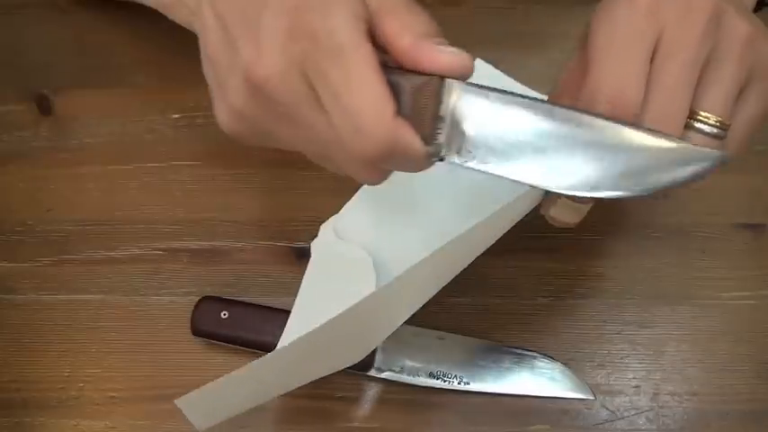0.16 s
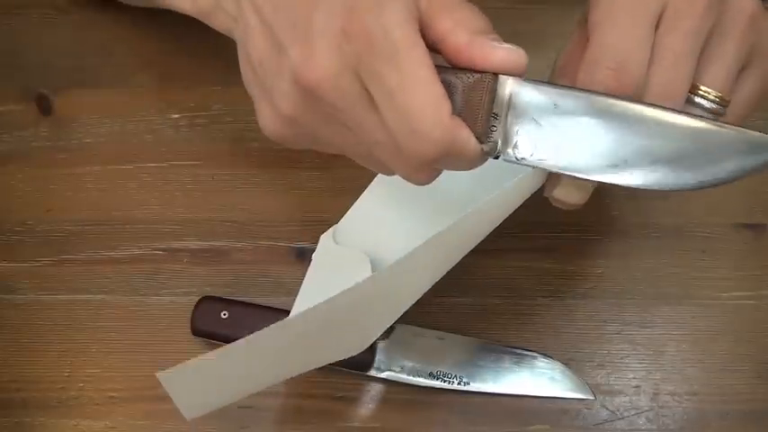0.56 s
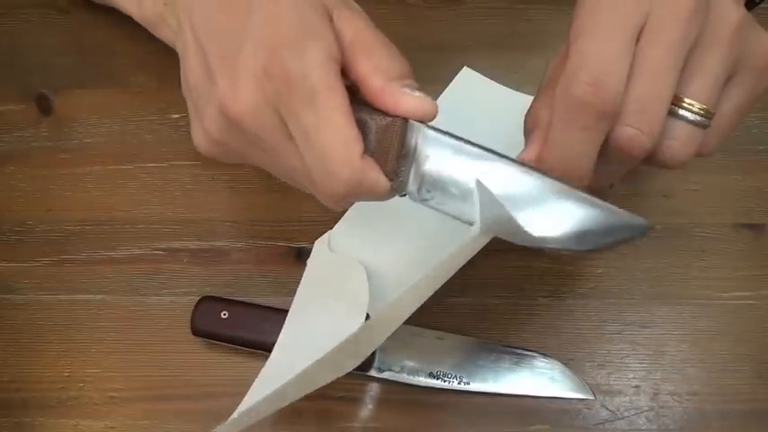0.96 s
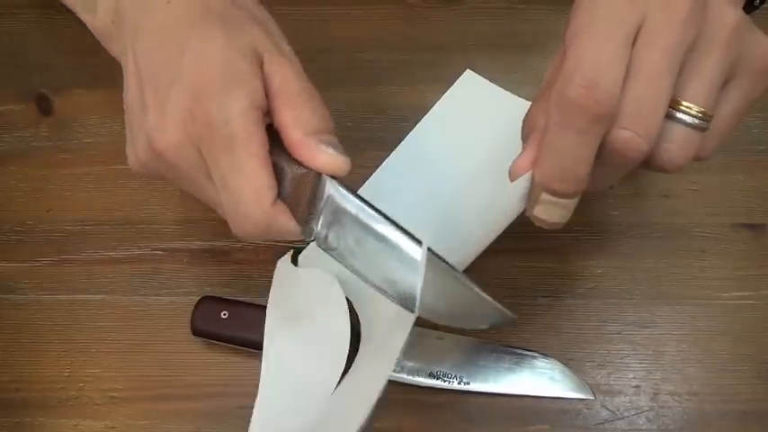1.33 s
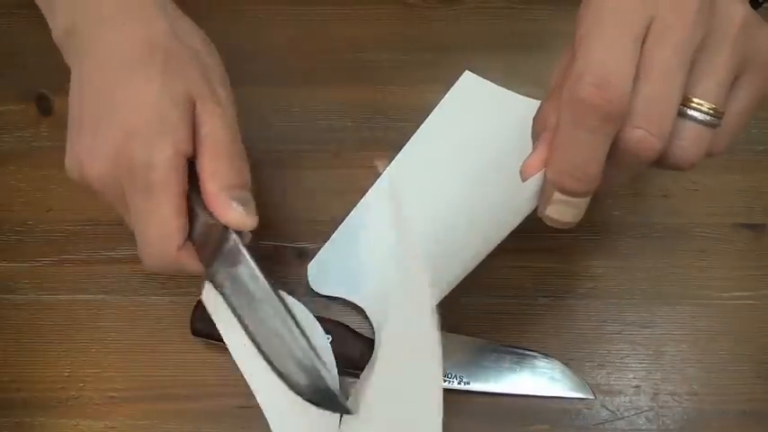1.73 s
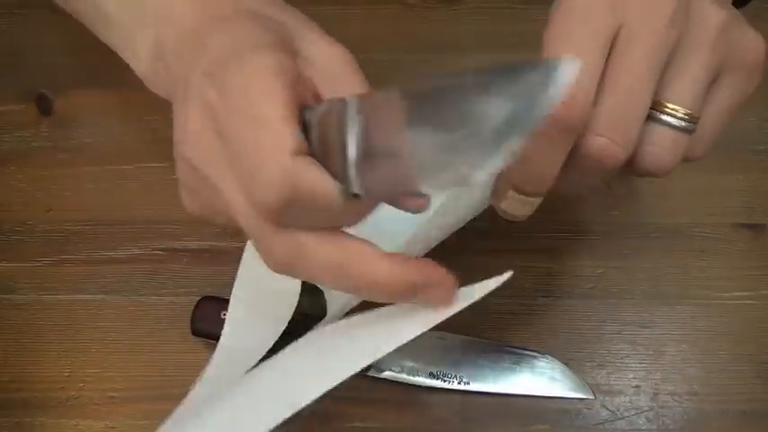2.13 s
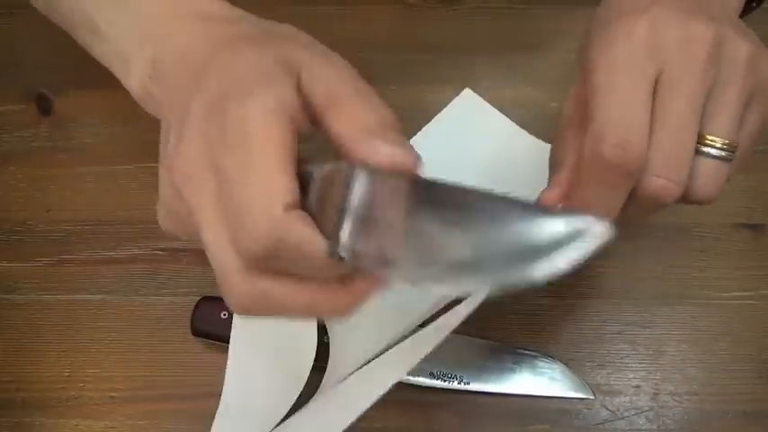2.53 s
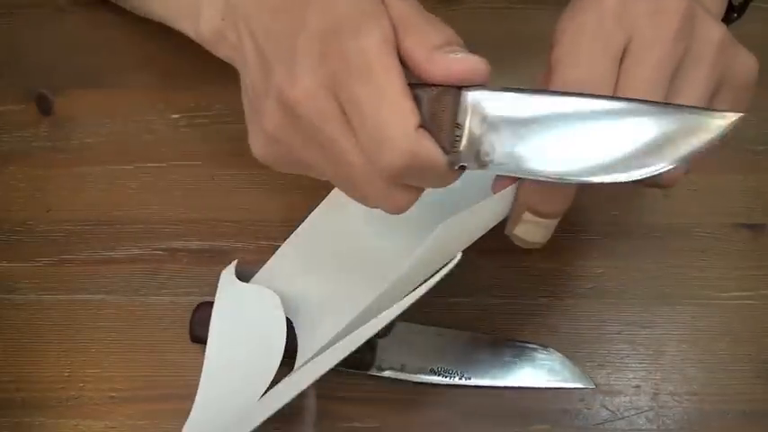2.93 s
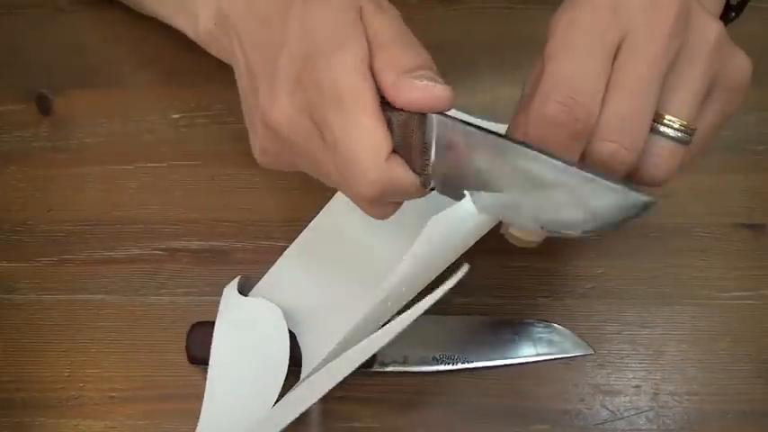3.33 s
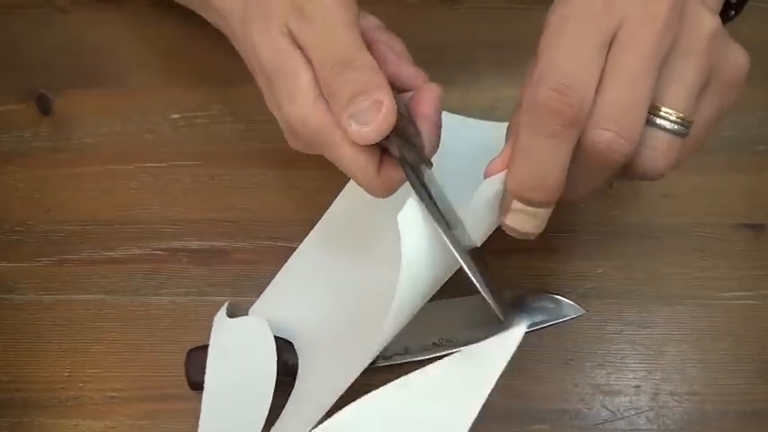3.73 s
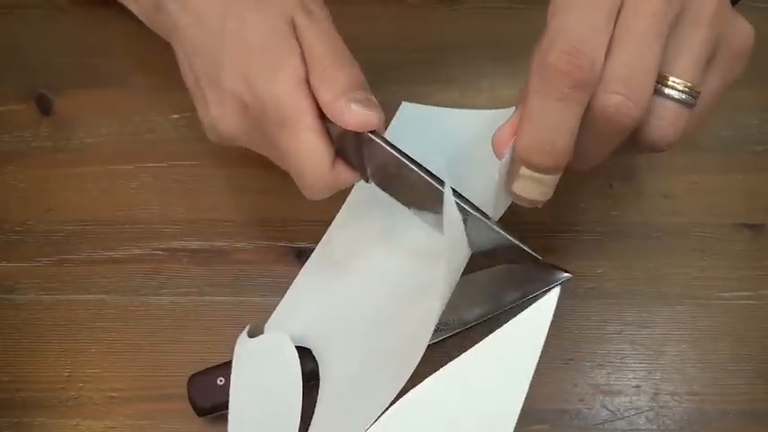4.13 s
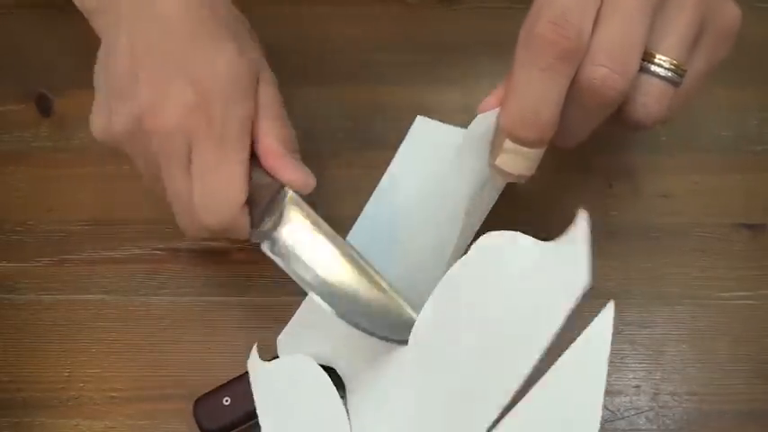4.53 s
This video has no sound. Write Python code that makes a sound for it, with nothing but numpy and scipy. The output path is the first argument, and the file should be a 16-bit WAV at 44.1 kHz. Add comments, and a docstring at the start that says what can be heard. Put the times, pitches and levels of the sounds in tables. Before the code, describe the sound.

Close up in a quiet room with faint hiss and low hum, a sharp blade cuts hand-held paper. After a near-silent start, a long raspy hiss swells for over a second and stops abruptly. Fingers rustle softly, with a few crisp creases and ticks, then a second, similar slicing hiss starts quickly and stays strong, with a hard snap just before the end. Microphone is near, with slight stereo width.

```python
"""A knife slices a hand-held sheet of paper in two long strokes over a wooden table, close to a camera.
Fibres part in a dense rush of tiny snaps, filtered by the bending sheet's narrow bands that come and go.
Before and between strokes the fingers rub the paper: clumped grains through a few soft resonances.
Creases and slower-rising paper ticks are snaps and puffs of noise through resonances.
The place is a quiet room of filtered hiss and hum; two close microphone ports give a little width."""
import sys
import numpy as np
from scipy import signal
from scipy.io import wavfile
from scipy.ndimage import uniform_filter1d

SR = 44100
rng = np.random.default_rng(int(sys.argv[2]) if len(sys.argv) > 2 else 0)


def wav_record(signal):
    """Record a signal, one row per channel, as 16-bit PCM in the file named by sys.argv[1]."""
    frames = np.transpose(np.atleast_2d(signal))
    bounded = np.clip(frames, -1, 1)
    # unit amplitude maps onto the largest positive 16-bit level
    quanta = np.round(bounded * 32767).astype(np.int16)
    wavfile.write(sys.argv[1], SR, quanta)


def nominal_scale(level):
    """Amplitude ratio for a level in decibels (scalar or array-like)."""
    x = np.asarray(level, float) / 20
    return 10 ** x


N = 205814  # samples

# room hiss, relative density before scaling to HISS_DB: (f/Hz, level/dB per Hz)
HISS_SPECTRUM = [(12, -47), (20, -11), (49, -27), (113, -3), (166, -16.5), (220, -2.5), (307, -13),
                 (429, -11), (536, -13), (791, -17), (1050, -14.5), (1270, -19), (7350, -30.5),
                 (15600, -34)]
HISS_DB = -51
# mains hum, resonances fed with noise: (f/Hz, width of each of two passes/Hz, level/dB)
HUM_BANDS = [(36.5, 7.4, -70), (101.7, 27, -51.5), (198.3, 47, -59.5), (309.3, 19.6, -59), (394.8, 14, -65)]
# microphone width of the room and of the paper: (f/Hz, side level relative to mid/dB)
ROOM_WIDTH = [(60, -38), (180, -26), (550, -10.5), (1650, -7.5), (4970, -16), (15000, -39)]
PAPER_WIDTH = [(60, -30), (180, -4.5), (550, -17.5), (1650, -21), (4970, -33), (15000, -41)]
ROOM_T60_S, ROOM_DB = 0.22, -19

# fingers moving on the paper, one table a pause: (t/s, level/dB, treble tilt/dB)
FINGER_MOVES = [
    [(0, -51, -10), (.074, -59.5, -5), (.132, -49.5, -2), (.17, -55.5, -4), (.262, -49, -4), (.32, -62, -7),
     (.50, -60, -7), (.586, -54, -7), (.64, -60, -6)],
    [(1.812, -36.5, -11), (1.86, -45, -13), (1.92, -50.5, -10), (2.08, -46.5, 1), (2.105, -49.5, -6),
     (2.19, -47, -5), (2.224, -47, -16), (2.238, -43, -6), (2.44, -45, -9.5), (2.51, -39.5, -2),
     (2.53, -49, -6), (2.58, -46.5, -0.5), (2.72, -46, -5), (2.81, -52, -8), (2.88, -52.5, -9),
     (2.98, -64, -9), (3.048, -50, -13), (3.11, -59.5, -8), (3.172, -57.5, -7), (3.21, -62, -6)],
]
# relative spectrum of skin on paper: (f/Hz, level/dB per Hz)
RUB_SPECTRUM = [(290, -16), (500, -5.5), (594, -4.5), (956, -13), (1600, -7.5), (2050, -10), (7600, -4),
                (10100, -7.5), (15600, -28)]
# bands that stand out in the rub: (f/Hz, width/Hz, level/dB)
RUB_BANDS = [(1640, 360, 3), (5500, 300, 3), (7600, 470, 1.5), (9940, 550, 2.5)]

# slower-rising paper ticks, most of them narrow, two broad puffs:
# (t/s, peak level before the band-pass/dB, f/Hz, t60/s, width/Hz)
SLOW_TICKS = [(.5287, -45, 7600, .036, 1200), (1.936, -36, 7900, .045, 1000),
              (2.187, -22, 1400, .089, 1500), (2.328, -32, 7470, 0.051, 700),
              (2.459, -41, 1560, 0.032, 600), (2.432, -40, 7600, .04, 700),
              (2.7335, -32, 1460, 0.065, 1000), (3.035, -41, 7300, .2, 700), (3.045, -35, 2500, .08, 2500)]
# creases that let go, broad and sudden: (t/s, peak level before the band-pass/dB, f/Hz, t60/s)
CREASE_SNAPS = [(.643, -25.5, 3480, 0.028), (1.9011, -21.5, 4380, .025), (2.0736, -28, 4230, .07),
                (2.1678, -15, 7000, 0.028), (2.1688, -16.5, 3330, 0.089), (2.174, -11, 3630, 0.046),
                (2.232, -34, 9000, .12), (2.2488, -32, 3200, .025), (2.5063, -16, 6170, 0.034),
                (2.5794, -27, 7000, .043), (2.6394, -25, 7000, .04), (2.8265, -29, 1150, 0.017),
                (4.5687, -1.5, 6000, 0.013)]
CREASE_RISE_S, SLOW_RISE_S = 0.0008, 0.0038
CREASE_WIDE = 1.5  # width as a share of the pitch
TICK_LOW_HZ, TICK_TOP_HZ = 500, 11900

# cutting force, one table a stroke: (t/s, force level/dB, then added tilts:
# boom under 1.5 kHz/dB, 8-11 kHz/dB, above 11 kHz/dB, 2-4 kHz/dB)
CUT_STROKES = [
    [(.635, -76, -4, -7, -20, 0), (.643, -43.5, -3, -2, -24, 6), (.734, -36, -18.5, -8, -3, -3),
     (.81, -32, -19, -7.5, -12, 2), (.84, -30.5, -8, -4.5, -13, 1), (1.04, -25, -9, 0, -4, 2),
     (1.10, -25, -7, 5, -7, -4), (1.20, -24, -15.5, -2.5, -11, -5.5), (1.33, -22, -14, -8, -10, -2),
     (1.512, -29.5, -1.5, -3.5, -10, 3), (1.67, -23.5, -2, -4, -7, 10.5), (1.80, -26, -4.5, 1, -2, 7),
     (1.816, -40.5, 5, -1, -14, -2)],
    [(3.205, -69, -8, -10, -14, -3), (3.218, -36, -10, -1, -11, 0), (3.30, -26.5, -16, -6, -15, -0.5),
     (3.345, -30, -26, -12.5, -11, -6), (3.44, -25, -20, 1.5, -12, -5), (3.47, -21.5, -15.5, -7, -4, 0),
     (3.58, -22, -17.5, -2, -4.5, 1.5), (3.80, -24.5, -15.5, -6.5, -6, -4.5),
     (3.88, -23, -16.5, -3.5, -1, -2.5), (4.08, -24.5, -9.5, -9.5, -14, -0.5),
     (4.28, -23.5, -2, -6.5, -1.5, 4.5), (4.39, -25.5, 1, -4, -10, 5.5), (4.55, -20.5, -6, -7.5, -0.5, 4),
     (4.667, -24, -5, -5, -6, -0.5)],
]
# relative spectrum of the parting fibres: (f/Hz, level/dB per Hz)
CUT_SPECTRUM = [(120, -28), (200, -19.5), (507, -6), (716, 0), (892, -3.5), (1600, -2), (2030, -9),
                (4280, -7), (4770, -5.5), (7520, -7), (10100, -4), (15600, -15)]
# bands where the bent sheet rings (+) or cancels (-), before flicker and the loss beside them:
# (middle t/s, length/s, f at the middle/Hz, level/dB)
SHEET_RINGS = [(.72, 0.18, 7800, 10), (.78, 0.26, 10000, 4), (0.805, 0.34, 3430, 10), (.85, 0.15, 12100, 3),
               (.86, .17, 8500, 7), (0.89, 0.76, 3900, 10.5), (0.93, .4, 9750, 8), (0.943, 0.38, 5500, 8.5),
               (0.947, 0.26, 10700, 5), (1.043, 0.34, 7000, 8), (1.03, 0.76, 1150, 2.5),
               (1.12, 0.63, 1740, 3), (1.30, .35, 6500, 8), (1.308, 0.28, 3260, 9), (1.22, 0.45, 9140, 7),
               (1.287, 0.27, 4750, 9), (1.336, 0.34, 5720, 12), (1.40, 0.57, 8150, 5),
               (1.45, 0.27, 10700, -1), (1.58, 0.12, 8650, 12), (1.623, 0.27, 3120, 1.5),
               (1.654, 0.3, 3900, 4.5), (1.76, 0.1, 7320, 12), (1.664, 0.31, 1040, 6.5),
               (1.673, 0.36, 6520, 8.5), (1.76, .2, 9450, 3), (3.29, .17, 6800, -13),
               (3.334, 0.19, 7570, 6), (3.433, 0.47, 3480, 12.5), (3.45, 0.49, 1640, 5),
               (3.49, 0.31, 3950, 9.5), (3.49, 0.56, 4750, 7.5), (3.52, 0.76, 5750, 4),
               (3.60, 0.43, 1230, 5.5), (3.624, 0.57, 9520, 7.5), (3.68, 0.68, 2870, 6),
               (3.75, 0.35, 10750, 8.5), (3.75, 0.5, 6220, 4), (3.86, 0.24, 3760, 8), (3.95, 0.3, 9340, 8),
               (3.83, 0.3, 4800, 9), (3.835, 0.23, 1780, 4.5), (3.845, .17, 5180, 10.5),
               (3.917, 0.56, 10250, 10), (3.947, 0.93, 8600, 7), (4.12, 0.12, 1200, 9),
               (4.202, .46, 5880, 10), (4.212, 0.38, 9600, 5), (4.3, 0.18, 10400, 11),
               (4.334, 0.22, 7550, 5.5), (4.402, 1, 756, -0.5), (4.386, 0.27, 1430, 2.5),
               (4.50, 0.36, 6300, 4), (4.50, 0.26, 11700, 3), (4.53, 0.38, 4950, 8.5)]
STILL_HZ, GLIDE_PER_S = 3560, 0.077  # bands above this climb as the cut advances, bands below sag
RING_WIDTH_HZ, WIDEN_SHARE = 260, 0.018  # higher bands are wider
RING_FLICKER = 0.21  # each band breaks up a little: rms share of its dB

EDGE_HZ = 15830  # top of the camera's band


def evened(x):
    """Scales to rms 1."""
    return x / np.sqrt(np.mean(x ** 2) + 1e-20)


def read(points, hz):
    """Reads a spectrum table on a log-frequency axis."""
    f, value = np.transpose(points)
    return np.interp(np.log(hz + 1), np.log(f + 1), value)


def shaped(x, field_db, size=512):
    """Colours x by a dB field that is a function of frequency and time."""
    overlap = 3 * size // 4
    hz, t, z = signal.stft(x, SR, nperseg=size, noverlap=overlap)
    z = z * nominal_scale(field_db(hz[:, None], t))
    return signal.istft(z, SR, nperseg=size, noverlap=overlap)[1][:len(x)]


def steady(points):
    """A dB field that holds one spectrum table at all times."""
    return lambda hz, t: read(points, hz) + 0 * t


def resonate(x, hz, width):
    """One resonance of gain 1: shifts its pitch to zero, smooths, and shifts back."""
    turn = np.exp(2j * np.pi * hz * np.arange(len(x)) / SR)
    r = np.exp(-np.pi * width / SR)
    return 2 * (turn * signal.lfilter([1 - r], [1, -r], x / turn)).real


def resonate_twice(x, hz, width):
    """Two equal resonances in a row, for steeper skirts."""
    return resonate(resonate(x, hz, width), hz, width)


def snaps(per_s, spread_db, clump_db, clump_s):
    """Sparse clicks of uneven size, arriving in clumps."""
    sign = rng.choice([-1., 1.], N)
    size = nominal_scale(spread_db * np.minimum(rng.exponential(1, N), 5)) * sign
    clumps = evened(uniform_filter1d(rng.standard_normal(N), max(int(clump_s * SR), 2)))
    happens = rng.random(N) < per_s / SR
    return evened(size * happens * nominal_scale(clump_db * clumps))


def patches(hz, t, bins, frames):
    """Random patches over frequency and time, rms 1."""
    field = rng.standard_normal((len(t), len(hz))).T
    field = uniform_filter1d(field, bins, 0)
    return evened(uniform_filter1d(field, frames, 1))


def column(tables, k, t, outside):
    """Column k of a list of curves at times t."""
    out = np.full(len(t), float(outside))
    for rows in tables:
        rows = np.array(rows)
        inside = (t >= rows[0, 0]) & (t <= rows[-1, 0])
        out[inside] = np.interp(t[inside], rows[:, 0], rows[:, k])
    return out


def level(tables):
    """Gain curve from the dB column, all but silent outside the tables."""
    return uniform_filter1d(nominal_scale(column(tables, 1, np.arange(N) / SR, -120)), size=90)


def band_power_db(field, band, hz):
    """Power that a dB field passes in a band when fed with white sound of rms 1."""
    return 10 * np.log10(2 * (nominal_scale(field[band]) ** 2).sum(0) / (2 * len(hz)))


def widen(x, side_table):
    """Two close microphone ports: they differ by a weak share of sound scattered in the room."""
    t = np.arange(SR // 8) / SR
    scatter = rng.standard_normal(len(t)) * nominal_scale(-60 * t / 0.19) * (t > .002)
    other = signal.oaconvolve(x, scatter / np.linalg.norm(scatter))[:N]
    side = shaped(other, steady(side_table), size=1024)
    return np.array([x + side, x - side])


def background():
    """Room hiss under a mains hum that wavers because narrow resonances are fed with noise."""
    hiss = shaped(rng.standard_normal(N), steady(HISS_SPECTRUM), size=4096)
    hum = np.zeros(N)
    for hz, width, db in HUM_BANDS:
        hum += nominal_scale(db) * evened(resonate_twice(rng.standard_normal(N), hz, width))
    return nominal_scale(HISS_DB) * evened(hiss) + hum


def rustle():
    """Skin and paper rub: sparse grains through a few ringing bands."""
    def rub_db(hz, t):
        treble = 1 / (1 + (4500 / (hz + 1)) ** 6)
        field = read(RUB_SPECTRUM, hz) + treble * column(FINGER_MOVES, 2, t, outside=0)
        for ring_hz, width, db in RUB_BANDS:
            field += db * np.exp(-2 * ((hz - ring_hz) / width) ** 2)
        field += 1.5 * patches(hz, t, bins=4, frames=20)
        # the level column sets the power of this band
        band = (hz[:, 0] > 1500) & (hz[:, 0] < 12000)
        return field - band_power_db(field, band, hz)
    grains = snaps(per_s=9000, spread_db=2.6, clump_db=2.0, clump_s=.004)
    return level(FINGER_MOVES) * shaped(grains, rub_db)


def room(x):
    """A short decaying tail, duller than the source."""
    t = np.arange(SR // 3) / SR
    dull = signal.lfilter([1], [1, -.8], rng.standard_normal(len(t)))
    tail = dull * nominal_scale(-60 * t / ROOM_T60_S) * (t > .004)
    return nominal_scale(ROOM_DB) * signal.oaconvolve(x, tail / np.linalg.norm(tail))[:N]


def ticks():
    """Creases and slower ticks: each a snap and a short puff of noise through a doubled resonance."""
    out, t = np.zeros(N + SR // 4), np.arange(SR // 4) / SR
    rows = [(*row, CREASE_WIDE * row[2], CREASE_RISE_S) for row in CREASE_SNAPS]
    rows += [(*row, SLOW_RISE_S) for row in SLOW_TICKS]
    for s, db, hz, t60, width, rise in rows:
        shape = np.minimum(t / rise, 1) * nominal_scale(-60 * np.maximum(t - rise, 0) / t60)
        puff = 0.24 * rng.standard_normal(len(t)) * shape
        puff[round(rise * SR)] += 2  # the snap comes at the top of the rise
        ring = resonate_twice(puff, hz, width)
        out[round(s * SR):][:len(t)] += nominal_scale(db) * ring / abs(ring).max()
    band = signal.butter(3, [TICK_LOW_HZ, TICK_TOP_HZ], "bandpass", fs=SR, output="sos")
    return signal.sosfilt(band, out[:N])


def rings_db(hz, t):
    """The sheet gathers sound into its ringing bands at the cost of the bands beside them."""
    field = np.zeros((len(hz), len(t)))
    for middle, length, ring_hz, db in SHEET_RINGS:
        near = abs(t - middle) < length
        since = t[near] - middle
        now_hz = ring_hz + GLIDE_PER_S * (ring_hz - STILL_HZ) * since
        width = RING_WIDTH_HZ + WIDEN_SHARE * ring_hz
        field[:, near] += db * np.exp(-2.8 * ((hz - now_hz) / width) ** 2 - (2 * since / length) ** 4)
    field *= 1 + RING_FLICKER * patches(hz, t, bins=5, frames=12)
    return field - uniform_filter1d(field, size=36, axis=0)


def cut():
    """Parting fibres drive the sheet, whose ringing bands shift as the cut advances."""
    def sheet_db(hz, t):
        boom = 1 / (1 + (hz / 1450) ** 6)
        high = 1 / (1 + (8000 / (hz + 1)) ** 14)
        top = 1 / (1 + (11400 / (hz + 1)) ** 30)
        presence = np.exp(-(np.log((hz + 1) / 3000) / 0.45) ** 4)
        field = read(CUT_SPECTRUM, hz) + rings_db(hz, t) + 2.4 * patches(hz, t, bins=2, frames=30)
        for k, tilt in enumerate([boom, high - top, top, presence], start=2):
            field += tilt * column(CUT_STROKES, k, t, outside=0)
        # the force sets the power of the middle band whatever rings
        middle_band = (hz[:, 0] > 1500) & (hz[:, 0] < 8000)
        return field - band_power_db(field, middle_band, hz)
    fibres = snaps(per_s=14000, spread_db=2.6, clump_db=1.1, clump_s=.002)
    return level(CUT_STROKES) * shaped(fibres, sheet_db)


def scene():
    """Paper sounds with their room tail, over the background."""
    paper = cut() + rustle() + ticks()
    return widen(paper + room(paper), PAPER_WIDTH) + widen(background(), ROOM_WIDTH)


def low_pass(x):
    """Removes everything above the highest recorded frequency."""
    return signal.sosfilt(signal.butter(12, 17030, fs=SR, output="sos"), x)


def record(dry):
    """The camera's band limit: a steep low-pass on both channels."""
    edge = signal.firwin(511, EDGE_HZ, window=("kaiser", 9), fs=SR)
    mix = signal.oaconvolve(dry, edge[None], "same", axes=1)
    return low_pass(mix)


dry = scene()
out = record(dry)
wav_record(out)
```